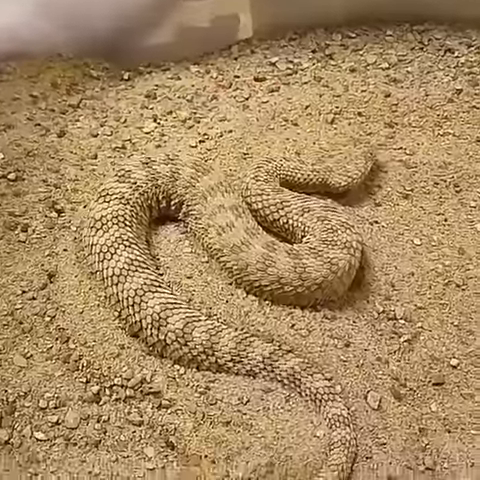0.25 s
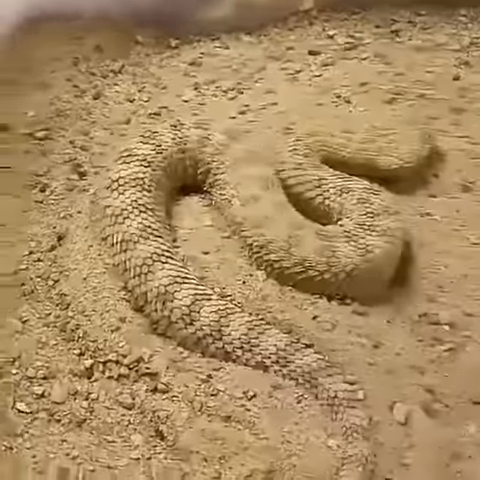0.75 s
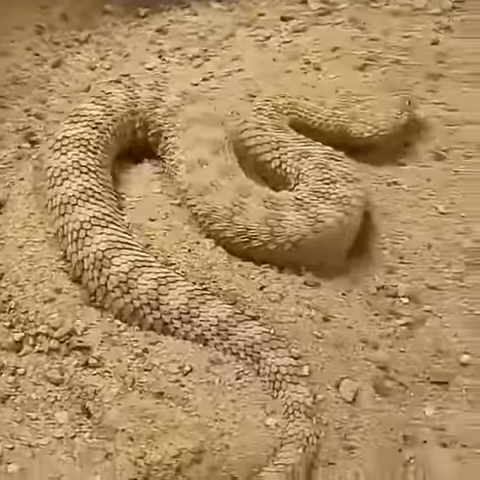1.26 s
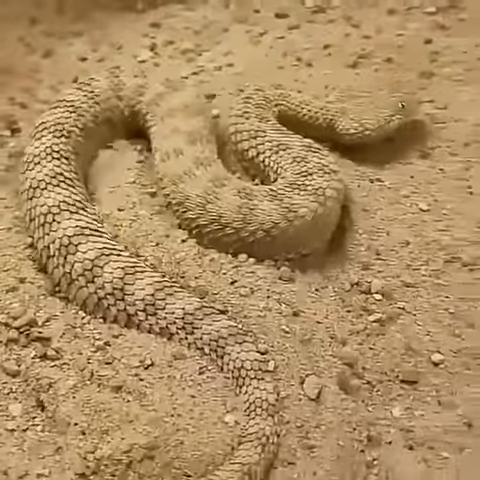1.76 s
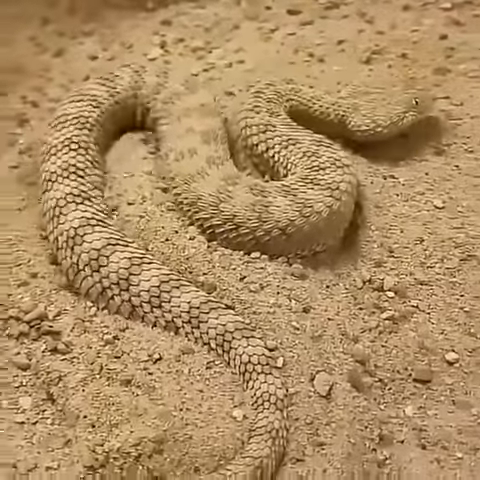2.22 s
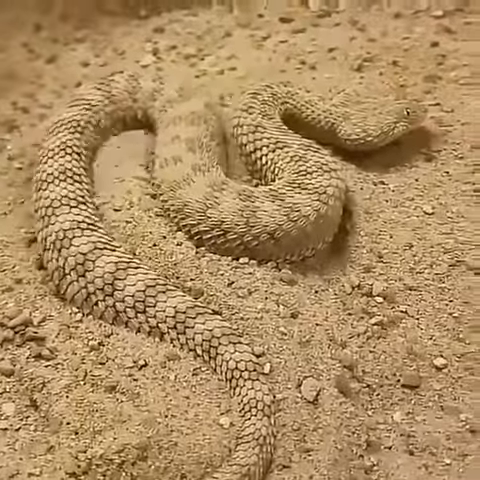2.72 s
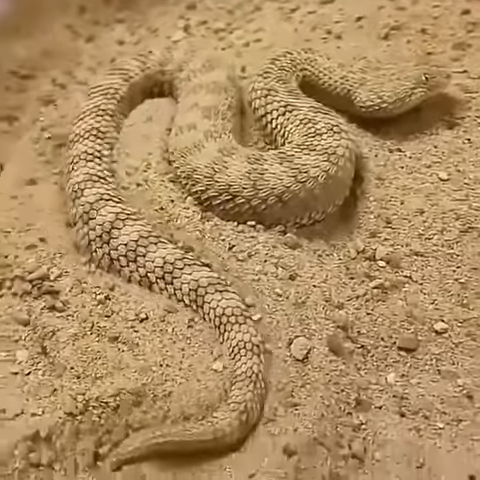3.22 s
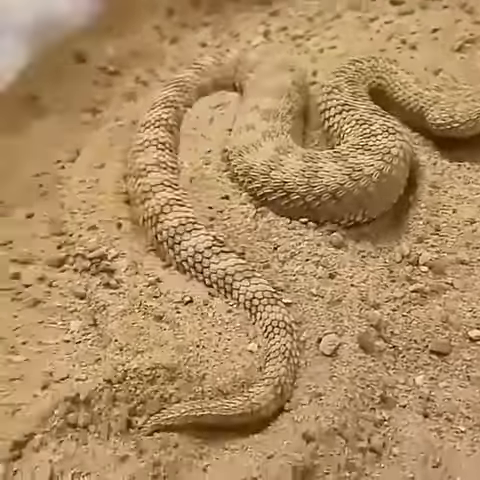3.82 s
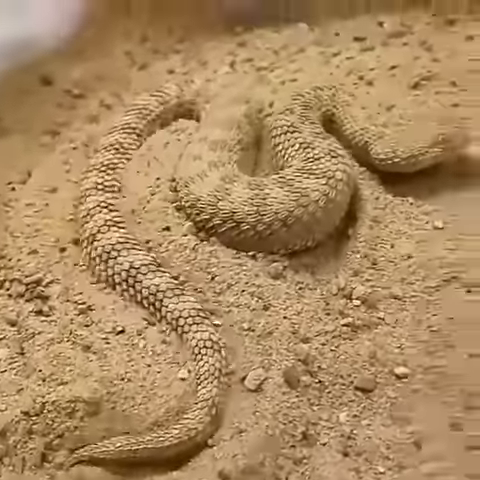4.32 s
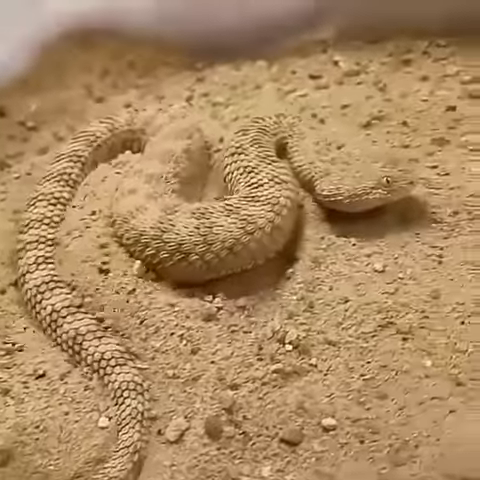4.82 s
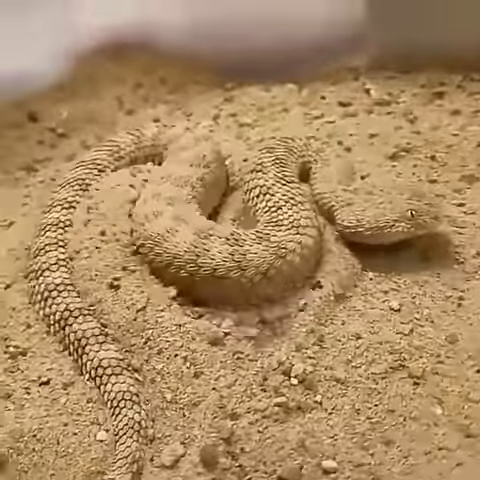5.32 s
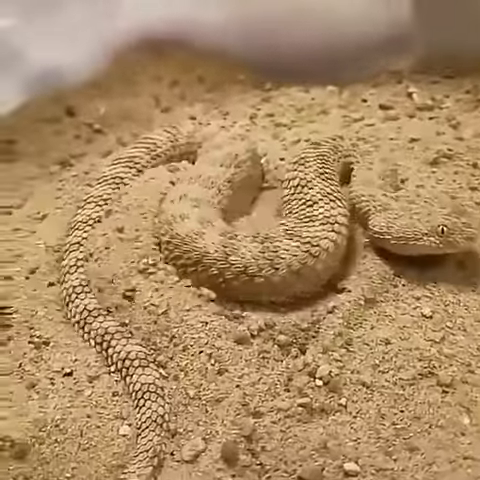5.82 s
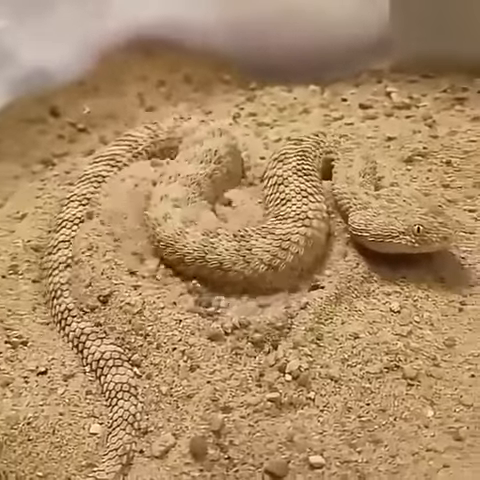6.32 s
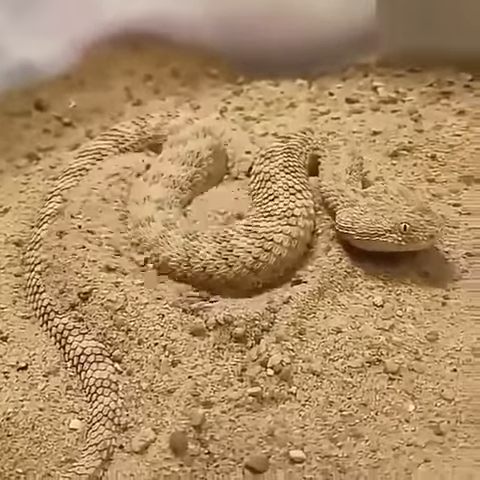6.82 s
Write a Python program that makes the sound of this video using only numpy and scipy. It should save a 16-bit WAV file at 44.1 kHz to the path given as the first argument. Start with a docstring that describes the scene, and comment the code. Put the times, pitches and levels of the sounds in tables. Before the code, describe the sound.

Scratchy rubbing strokes and small plasticky clicks over a low indoor motor hum, busiest in the first two seconds, then sparse and faint.

```python
"""In a room where motors hum and air hisses, a small hand-held recorder hangs over a tub of sand.
Fingers slide over its plastic housing in short scratchy strokes, made of stick-slip clicks and hiss.
As the grip shifts they knock the housing, which rings in dying sines and bounces in the hand.
The housing carries both straight to the microphone, which the moving hand also shakes in low lumps.
The room adds wavering sines for the motors and filtered noise for the air; the treble flickers."""
import sys
import numpy as np
from scipy import signal
from scipy.io import wavfile
from scipy.ndimage import uniform_filter1d

SR = 44100
rng = np.random.default_rng(int(sys.argv[2]) if len(sys.argv) > 2 else 0)


def gain_from_db(level_db):
    """Turn a decibel level (scalar or array-like) into a linear amplitude factor."""
    decades = np.asarray(level_db, float) / 20
    return 10 ** decades


def master_out(mix):
    """Clip the mix to full scale and print it as 16-bit PCM to the path in sys.argv[1]."""
    frames = np.transpose(np.atleast_2d(mix))
    ceiling = np.clip(frames, -1, 1)
    pcm = np.round(ceiling * 32767).astype(np.int16)
    wavfile.write(sys.argv[1], SR, pcm)


N = 311346

# Finger strokes, one list a stroke. Each row: time in seconds, rub level in dB rms,
# low drag in dB over the rub, grit in dB over the rub.
STROKE_CURVES = [
    [(0.43, -44, 4, -9), (0.434, -49.5, -1, -9), (0.46, -49.5, -12, -12.5), (0.516, -54, -12, -16.5),
     (0.59, -47, -11, -14), (0.626, -54.5, -9, -15.5), (0.655, -75, -11, -2)],
    [(0.668, -59, -7, 2), (0.684, -58, -5, -20), (0.69, -57, 7, -16), (0.7, -56.5, -8, -9),
     (0.71, -59, -15, -9), (0.719, -64, -12, -16), (0.741, -63.5, 16, -1.5), (0.753, -55, 1, -8.5),
     (0.811, -49, -11, -6.5), (0.849, -54, 2, -3), (0.915, -63, -6, -8)],
    [(0.915, -67, -2, -3), (0.922, -61, -6, -1), (0.93, -49.5, -2, -2), (1.075, -47, -5, -5),
     (1.121, -47.5, 1.5, -3.5), (1.161, -45, -3.5, -8.5), (1.195, -54.5, 2, 3), (1.22, -44, -2, -24)],
    [(1.22, -43, -9, -13), (1.244, -51.5, 6, 0.5), (1.254, -41, -2.5, -9), (1.28, -43, -4, -7.5),
     (1.295, -46, 11, -7.5), (1.312, -45.5, -1, -8), (1.344, -51, 6.5, -6), (1.42, -53.5, 9.5, -6.5),
     (1.455, -53.5, 10, -9.5), (1.468, -46.5, 11, -7), (1.48, -48.5, 10.5, -7), (1.53, -47.5, 0, -12)],
    [(1.53, -55.5, 18.5, -11), (1.556, -37.5, 4, -10.5), (1.604, -40.5, 5.5, -7), (1.622, -43, 7, -11.5),
     (1.644, -44, 1.5, -7), (1.664, -38.5, 6, -14), (1.72, -74.5, 12, -1)],
    [(1.72, -75, 1, -12), (1.764, -59, -9, -7), (1.78, -64, 4, -6), (1.798, -76, 2, -13),
     (1.808, -82, 10, -4), (1.816, -75, -6, -15), (1.835, -63, 16, -1)],
    [(1.848, -49, 2, -2), (1.858, -44.5, 8, -13), (1.867, -40, -5, -14), (1.877, -44.5, 4, -3.5),
     (1.923, -46, -3, -4.5), (1.951, -46.5, -13, -3), (1.959, -46, -24, -5), (1.974, -53, -10, -4),
     (1.982, -63, 5, -3), (2.0, -71, 6, -10)],
    [(2.963, -61, 5, -2), (2.982, -60, -4, -14), (3.005, -69, -3, -1), (3.022, -60.5, 3, -4.5),
     (3.036, -70, 5, -4), (3.054, -74, -6, -10), (3.06, -91, 8, -3), (3.07, -85, 17, -8)],
    [(3.09, -83, 12, -13), (3.102, -74, -14, -5), (3.114, -63, -10, -10), (3.136, -59.5, -5, -6),
     (3.152, -75, 2, -12), (3.16, -79, 17, -15)],
    [(3.52, -73, 10, -3), (3.534, -62.5, 4, -12), (3.62, -61, 2, -21), (3.66, -57, -4, -8),
     (3.702, -52, 3, -6), (3.76, -56, -6, -4), (3.828, -58.5, -25, -2.5), (3.858, -54.5, -6, -4.5),
     (3.89, -55.5, -8, -12), (3.914, -51.5, -16, -19), (3.98, -74, 13, -1)],
    [(3.98, -66.5, -3, -2), (4.152, -60.5, -1, -17), (4.17, -52, 6, -4), (4.188, -51, 2, -2.5),
     (4.194, -45.5, 3, -5), (4.212, -40.5, 2, -2), (4.224, -41.5, -1, 2.5), (4.238, -42, 1, -0.5),
     (4.256, -44, 13, -1.5), (4.274, -47, -9, -18), (4.3, -58, -9, -15)],
    [(4.3, -56, -2, -13), (4.314, -56.5, -12, -6), (4.372, -61.5, 10.5, -3.5), (4.418, -58, -6, -19),
     (4.438, -65.5, 15, -2), (4.448, -59.5, 9.5, -27), (4.49, -56.5, 5, -7)],
    [(4.52, -56, 16.5, -21), (4.532, -74, 9, -16), (4.558, -61, 0, -26), (4.57, -64, 3, -27),
     (4.594, -53, -3, -26), (4.616, -60, 0, -9), (4.625, -57, 6, -14)],
    [(4.655, -56, 12, -9), (4.663, -61, 5, -19), (4.687, -63, 3, -25), (4.705, -70, 17, -0.5),
     (4.721, -58.5, 8, -14), (4.747, -63.5, 3, -32), (4.8, -97, 15, -9)],
]
# Topmost sizzle of each stroke. Each entry: level in dB beyond the sizzle law in layer_gains.
STROKE_SIZZLE_DB = [-3, 2, 0.5, 2, 2.5, -3, 1.5, -4, -11, -6.5, -3, -3.5, -13, -4]
# Colours of the five rub layers through housing and microphone port.
# Each row: frequency in Hz, relative level in dB per Hz.
RUB_COLOUR = [(300, -23), (520, -14.5), (900, 2.5), (1200, -3), (1600, -11.5), (2200, -21)]
DRAG_COLOUR = [(150, -7.5), (220, -4), (380, 1), (550, -2.5), (800, -15.5), (1200, -64)]
SCRATCH_COLOUR = [(1000, -10.5), (1500, -6.5), (2100, -0.5), (2600, -4.5), (3200, -21), (4000, -28)]
FIZZ_COLOUR = [(2800, 0), (3600, -5), (4700, 3.5), (6000, -3.5), (7000, -9), (7700, -29), (8500, -38)]
SIZZLE_COLOUR = [(6500, -14), (7700, -10.5), (9500, -1.5), (12900, 2.5), (14000, -17)]
# Knocks on the housing. Each row: start in seconds, click peak in dB before its grit is added,
# thud peak in dB, thud frequency in Hz, time constant of the contact in ms.
KNOCK_EVENTS = [(.2405, -45, -59, 110, 0.17), (0.4189, -14.5, -36, 125, 0.067),
                (0.6815, -25, -32, 333, 0.056), (.692, -44, -33, 403, 0.17), (0.697, -36, -43.5, 119, .15),
                (.753, -46, -36, 250, .4), (1.579, -40, -41, 50, .16), (1.8472, -47, -23.5, 267, 0.37),
                (1.947, -55, -33.5, 69, 0.32), (2.956, -35, -28.5, 122, 0.093),
                (3.015, -58, -38, 116, 0.28), (3.2501, -50, -35, 125, 0.15), (3.595, -42, -40, 110, 0.039),
                (3.852, -46, -57, 110, .2), (3.871, -32, -38, 91, 0.22), (4.26, -36, -21, 116, 0.18),
                (4.416, -39, -40, 115, .2), (4.446, -54, -33, 134, 0.3), (4.456, -54, -35, 110, .23),
                (4.5062, -37, -39, 130, 0.21), (4.6371, -27.5, -37.5, 130, 0.17),
                (5.263, -62, -38, 129, 0.35), (6.076, -66, -39.5, 99, 0.62), (6.305, -64, -30.5, 120, 0.48),
                (6.922, -62, -40, 109, .4)]
# Modes of the knocked housing. Each row: frequency in Hz, relative level in dB, 60 dB decay in seconds.
HOUSING_MODES = [(450, 3, 0.029), (840, 28, 0.0049), (1254, 2.5, 0.013), (2000, 11.5, 0.0082),
                 (2760, -11, 0.0024), (4800, 9, 0.0093)]
# Low shaking from the moving hand. Each row: time in seconds, level in dB.
SWAY_CURVE = [(0.9, -78), (1.46, -60), (1.92, -57), (2.04, -64), (2.93, -67), (3.29, -63), (3.77, -58),
              (4.3, -48), (4.46, -47.5), (4.69, -51), (4.9, -62), (7.0, -64)]
# Colour of the shaking. Each row: frequency in Hz, relative level in dB per Hz.
SWAY_COLOUR = [(20, -57), (45, -5), (100, -9), (160, -8), (250, -20)]
# Motor tones. Each row: frequency in Hz, level in dB rms, both before wavering and swell.
MOTOR_TONES = [(117, -61), (170, -66.5), (199.2, -50), (248, -62.5), (269.2, -56.5), (292, -65.5),
               (320, -71.5), (339, -75), (398, -73), (408, -67.5), (467, -71), (510, -84), (584, -76.5),
               (642, -74), (700, -81), (980, -84.5)]
# Room air and microphone hiss. Each row: frequency in Hz, relative level in dB per Hz.
AIR_COLOUR = [(20, 2), (60, -6.5), (150, -10.5), (230, 5), (300, -3), (450, -7), (560, -14), (900, -14.5),
              (1200, -23), (2200, -24.5), (3500, -28.5), (4700, -30.5), (7000, -40.5), (8300, -48.5),
              (10000, -35.5), (13000, -37.5)]
# The room sags, then swells in at the start. Each row: time in seconds, change of tones in dB,
# change of air in dB.
ROOM_SWELL = [(0, -0.5, -2), (.3, -9.5, -1), (.95, -12, -3), (1.15, -7, 1), (1.38, 1, 1.2), (7.1, 2, 2)]
# Flicker of the treble. Each row: frequency in Hz, depth in dB.
FLICKER_DEPTH = [(1000, 0), (2500, 1.5), (5000, 3), (7000, 7), (9000, 5), (12000, 3)]


def evened(x):
    """Normalisation: scales a signal to unit mean power."""
    return x / np.sqrt(np.mean(x ** 2) + 1e-20)


def colour(x, points):
    """Minimum-phase filtering: a causal response of the given magnitude, result at unit power."""
    hz, db = np.transpose(points)
    f = abs(np.fft.fftfreq(8192, 1 / SR))
    gain_db = np.interp(np.log(f + 1), np.log(hz), db, left=-90, right=-90)
    log_gain = gain_db * np.log(10) / 20
    # the Hilbert transform of the log magnitude gives the phase
    response = np.exp(np.conj(signal.hilbert(log_gain)))
    taps = np.fft.ifft(response).real[:4096]
    return evened(signal.oaconvolve(x, taps)[:N])


def drift(per_s):
    """Slow random fluctuation: straight lines join per_s normal knots of unit spread a second."""
    knots = rng.standard_normal(400)
    return np.interp(np.arange(N) / SR * per_s, np.arange(400), knots)


def slips(per_s, spread_db, clump_db, smooth):
    """Stick-slip friction: random clicks of uneven size over a smooth hiss, both swelling in clumps."""
    happens = rng.random(N) < per_s / SR
    size = np.minimum(rng.exponential(1, N), 4)
    sign = rng.choice([-1., 1.], N)
    clicks = evened(sign * gain_from_db(spread_db * size) * happens)
    hiss = rng.standard_normal(N)
    return (clicks + smooth * hiss) * gain_from_db(clump_db * drift(45))


def layer_gains(rub_db, drag_db, grit_db, sizzle_db):
    """Sliding friction: gains of rub, drag, scratch, fizz and sizzle, the bright ones led by the grit."""
    scratch_db = 1 + 0.91 * grit_db
    top_db = sizzle_db - 4 + 1.27 * grit_db
    return gain_from_db(rub_db + np.array([0 * grit_db, drag_db, scratch_db, grit_db, top_db]))


def brushes():
    """Random arrivals: resting fingers brush faintly, each brush a bell-shaped swell of level."""
    per_s, width_s, spread_db = 14, 0.015, 1.5
    t = np.arange(N) / SR
    coarse_t = t[::64]
    starts = np.cumsum(rng.exponential(1, 150)) / per_s
    sizes = np.clip(rng.standard_normal(150), -2, 1.5)
    swells = sum(gain_from_db(spread_db * size) * np.exp(-((coarse_t - s) / width_s) ** 2)
                 for s, size in zip(starts, sizes))
    gains = layer_gains(rub_db=-73, drag_db=3, grit_db=-2.5, sizzle_db=0)
    return gains[:, None] * np.interp(t, coarse_t, swells)


def strokes():
    """Stick-slip of skin on plastic: pressure feeds the low drag, speed the finer and brighter grit."""
    t = np.arange(N) / SR
    level = brushes()
    for rows, sizzle_db in zip(STROKE_CURVES, STROKE_SIZZLE_DB):
        s, *curves = np.transpose(rows)
        near = slice(round((s[0] - .01) * SR), round((s[-1] + .01) * SR))
        # each stroke fades in and out over 4 ms
        edge = np.clip(np.minimum(t[near] - s[0], s[-1] - t[near]) / .004 + .5, 0, 1)
        rub_db, drag_db, grit_db = [np.interp(t[near], s, c) for c in curves]
        level[:, near] += edge * layer_gains(rub_db, drag_db, grit_db, sizzle_db)
    coarse = slips(per_s=900, spread_db=1.5, clump_db=1.6, smooth=1.0)
    fine = slips(per_s=5000, spread_db=3.5, clump_db=1.4, smooth=0.75)
    finest = slips(per_s=37000, spread_db=4.0, clump_db=-2.0, smooth=0.66)
    # in the order of layer_gains
    layers = [colour(coarse + 0.24 * fine, RUB_COLOUR),
              colour(coarse, DRAG_COLOUR),
              colour(fine + 0.74 * coarse, SCRATCH_COLOUR),
              colour(fine + 0.12 * coarse, FIZZ_COLOUR),
              colour(finest + 0.24 * fine, SIZZLE_COLOUR)]
    return (level * layers).sum(0)


def ring(modes, rise_ms):
    """Modal vibration: a sum of dying sines that take a moment to build up."""
    t = np.arange(4000) / SR
    sines = sum(gain_from_db(db - 60 * t / t60) * np.sin(2 * np.pi * hz * t) for hz, db, t60 in modes)
    return sines * (1 - np.exp(-t * 1000 / rise_ms))


def knocks():
    """Impact: a short push rings the shell, duller the longer the contact, and bounces the recorder."""
    thud_cycles = 4.04  # the bounce in the hand dies by 60 dB in this many swings
    out = np.zeros(N + SR)
    push_ms = np.arange(300) * 1000 / SR
    t = np.arange(4000) / SR
    shell = ring(HOUSING_MODES, rise_ms=0.61)
    for s, click_db, thud_db, thud_hz, contact_ms in KNOCK_EVENTS:
        push = push_ms * np.exp(-push_ms / contact_ms)
        click = np.convolve(shell, push)[:len(t)]
        # a little grit scatters around the contact
        grit = rng.standard_normal(len(t)) * t * np.exp(-t / 0.00115)
        puff = np.convolve(grit, push)[:len(t)]
        hit = click / abs(click).max() + 0.21 * puff / abs(puff).max()
        # the bounce starts near the top of its swing
        swing = np.cos(2 * np.pi * thud_hz * t + 0.22)
        rise = 1 - np.exp(-t * 1000 / (2.06 * contact_ms))
        thud = swing * gain_from_db(-60 * t * thud_hz / thud_cycles) * rise
        knock = gain_from_db(click_db) * hit + gain_from_db(thud_db) * thud / abs(thud).max()
        out[round(s * SR):][:len(t)] += knock
    high_pass = signal.butter(2, 45, "high", fs=SR, output="sos")
    return signal.sosfilt(high_pass, out[:N])


def sway():
    """Low-frequency agitation: the moving hand shakes the microphone in low lumps."""
    s, db = np.transpose(SWAY_CURVE)
    lumps = slips(per_s=180, spread_db=1.0, clump_db=-3.5, smooth=0.18)
    return gain_from_db(np.interp(np.arange(N) / SR, s, db)) * colour(lumps, SWAY_COLOUR)


def motors():
    """Tonal radiation: sines whose level and pitch waver independently."""
    tones = np.zeros(N)
    for hz, db in MOTOR_TONES:
        level = np.sqrt(2) * gain_from_db(db + 1.9 * drift(6))
        pitch_hz = hz + 0.665 * drift(4.02)
        turns = np.cumsum(pitch_hz) / SR + rng.random()
        tones += level * np.sin(2 * np.pi * turns)
    return tones


def patchwork(shape, bins, frames):
    """Smoothed randomness: unit-power patches over frequency bins and time frames."""
    noise = rng.standard_normal(shape)
    return evened(uniform_filter1d(uniform_filter1d(noise, size=bins, axis=0), size=frames, axis=1))


def room_air():
    """Broadband noise: coloured hiss, patchy in time and frequency, of slowly drifting level."""
    z = signal.stft(colour(rng.standard_normal(N), AIR_COLOUR), nperseg=512)[2]
    patches = patchwork(z.shape, bins=4, frames=8)
    air = signal.istft(z * gain_from_db(1.5 * patches), nperseg=512)[1][:N]
    return evened(air) * gain_from_db(0.4 * drift(20))


def room():
    """Superposition of ambient sources: wavering motor tones over patchy air noise."""
    air_base_db = -56.5  # before the swell
    t = np.arange(N) / SR
    s, tones_db, air_db = np.transpose(ROOM_SWELL)
    tones = gain_from_db(np.interp(t, s, tones_db)) * motors()
    return tones + gain_from_db(air_base_db + np.interp(t, s, air_db)) * room_air()


def flicker(x):
    """Time-varying spectral gain: treble patches dip for some tens of ms, a few almost to silence."""
    hz, _, z = signal.stft(x, SR, nperseg=1024)
    patches = patchwork(z.shape[1:], bins=11, frames=3)
    depth_db = np.interp(hz, *np.transpose(FLICKER_DEPTH))[:, None]
    # the lowest patches are pulled down further
    extra_dip = 2.1 * np.maximum(-patches - .7, 0)
    gain = gain_from_db(depth_db * (patches - extra_dip))
    # each frequency keeps unit mean power gain
    gain /= np.sqrt((gain ** 2).mean(1, keepdims=True))
    return signal.istft(z * gain, SR, nperseg=1024)[1][:, :N]


def scene():
    """Superposition: strokes, knocks, sway and room add up at one microphone."""
    return (strokes() + knocks() + sway() + room())[None]


def low_pass(x):
    """Removes everything above the highest recorded frequency."""
    return signal.sosfilt(signal.butter(12, 13130, fs=SR, output="sos"), x)


def record(dry):
    """Signal chain: the treble of the mix flickers on its way to the output."""
    mix = flicker(dry)
    return low_pass(mix)


dry = scene()
out = record(dry)
master_out(out)
```